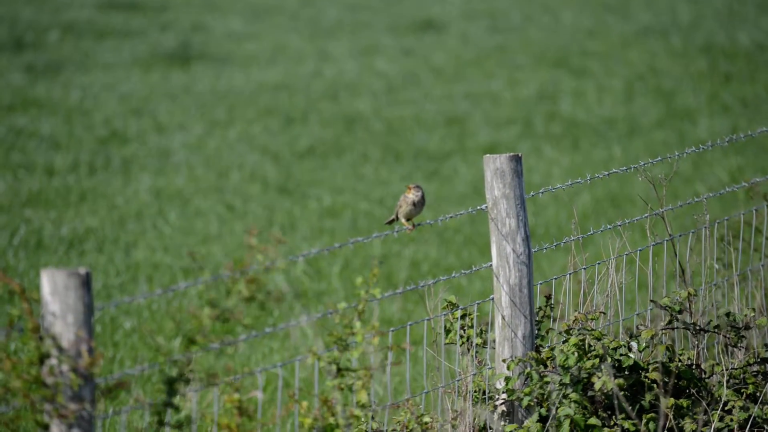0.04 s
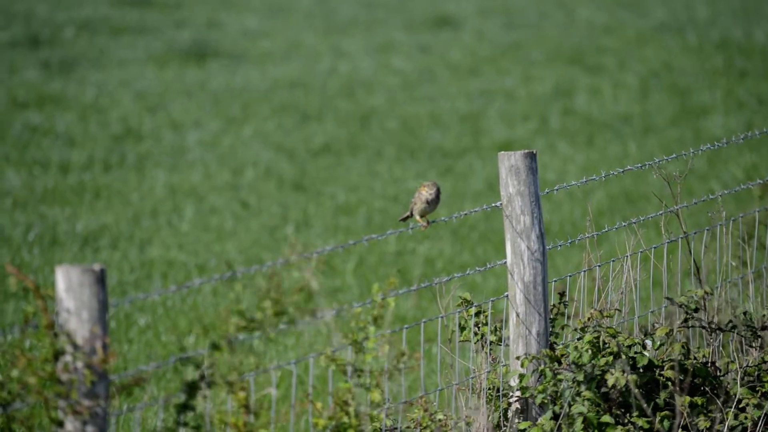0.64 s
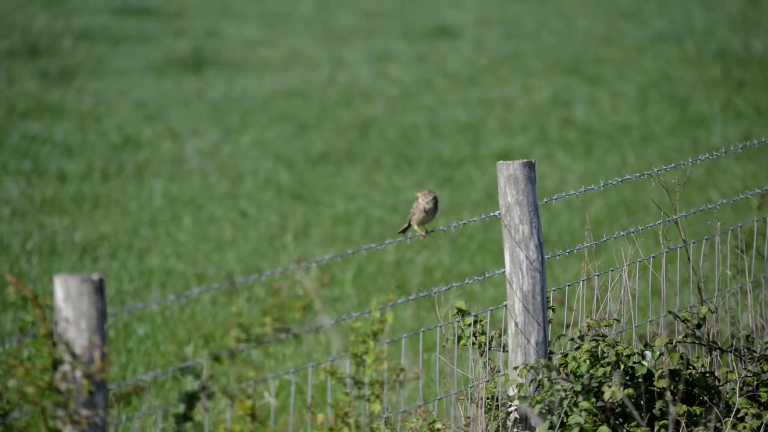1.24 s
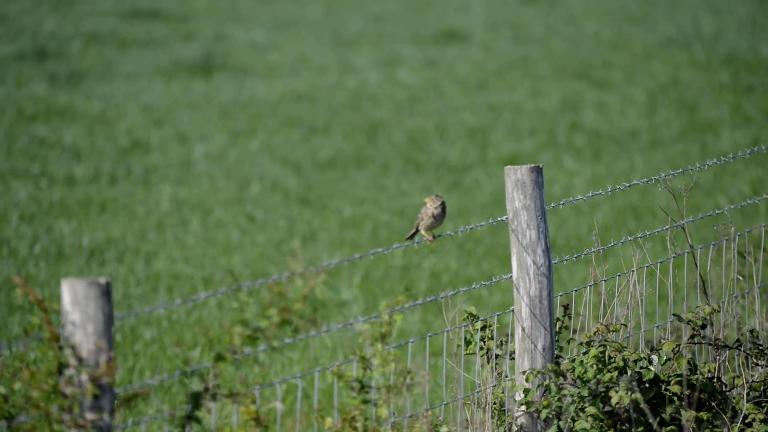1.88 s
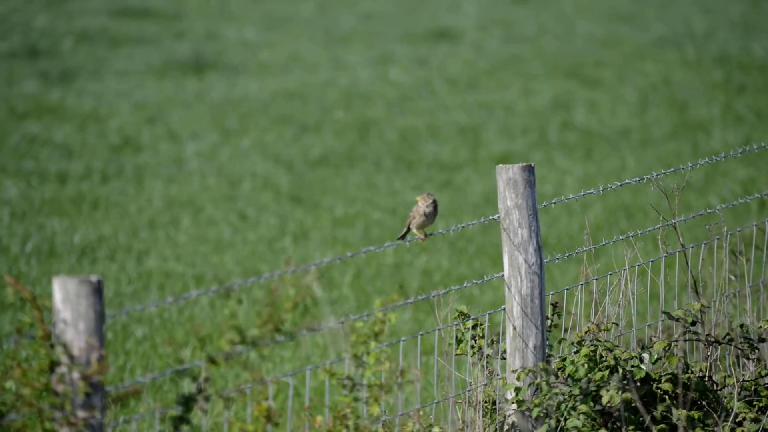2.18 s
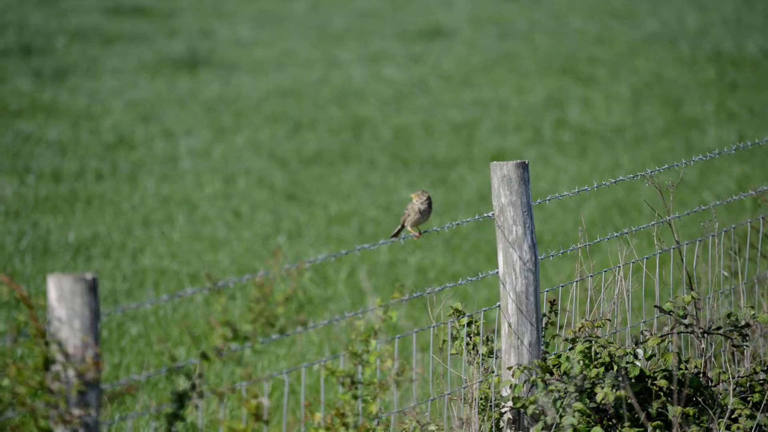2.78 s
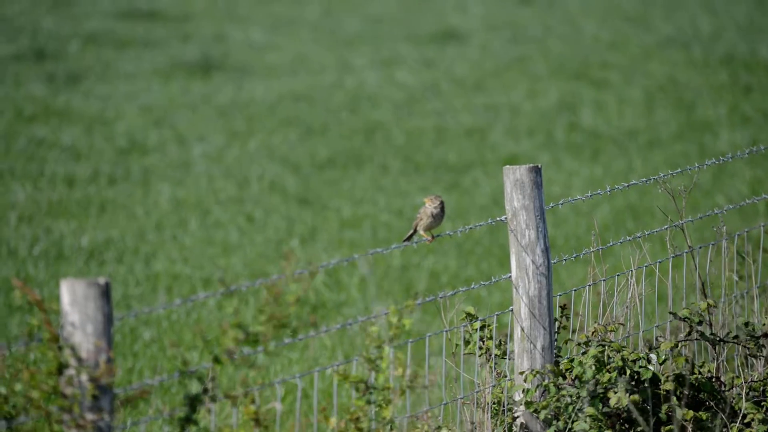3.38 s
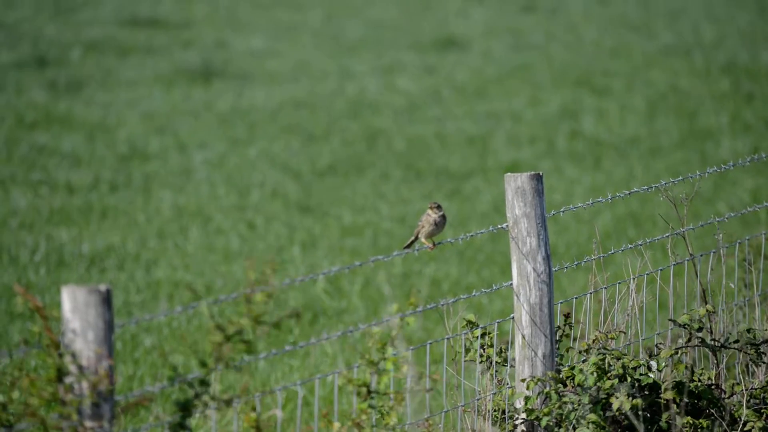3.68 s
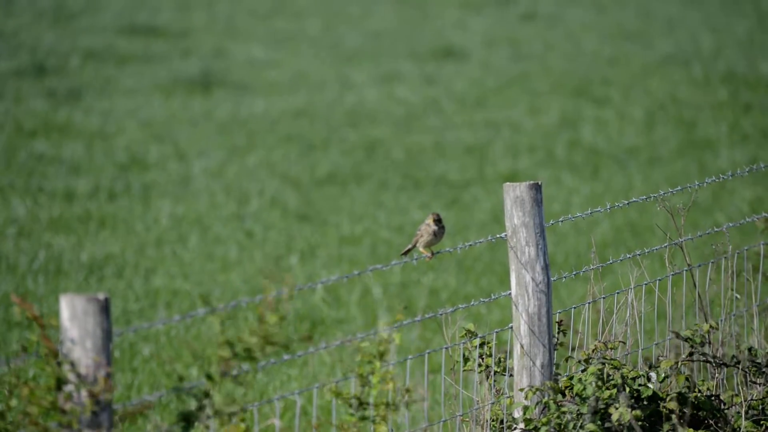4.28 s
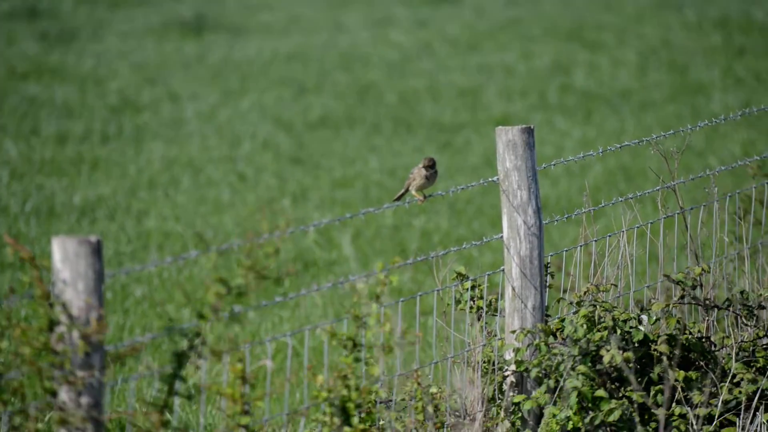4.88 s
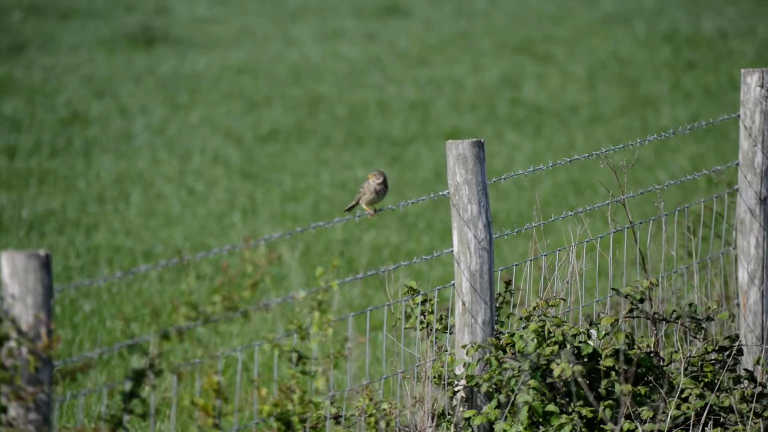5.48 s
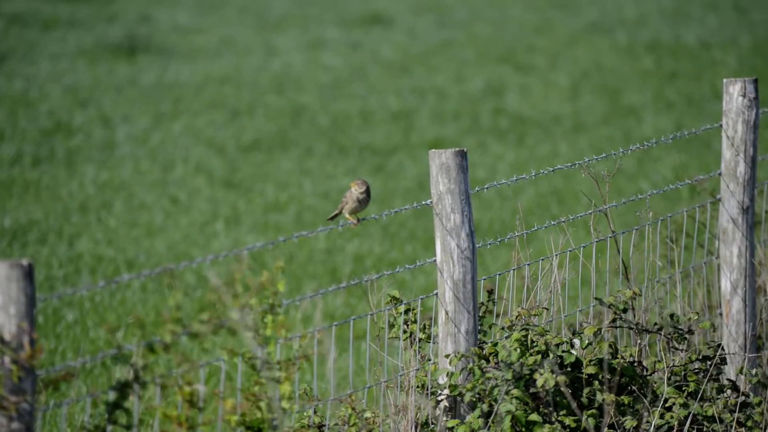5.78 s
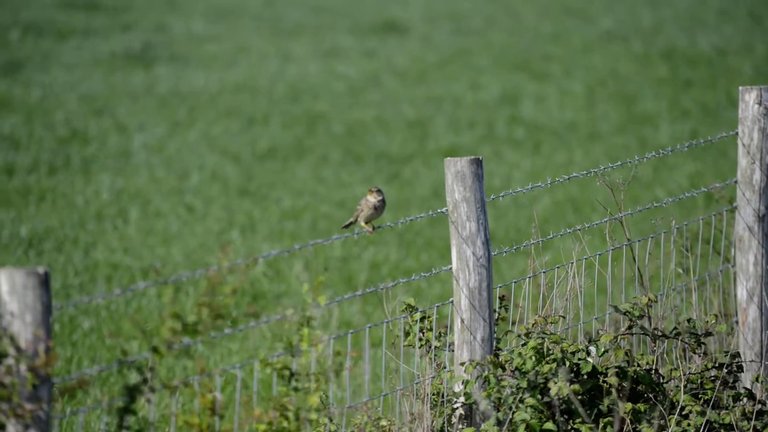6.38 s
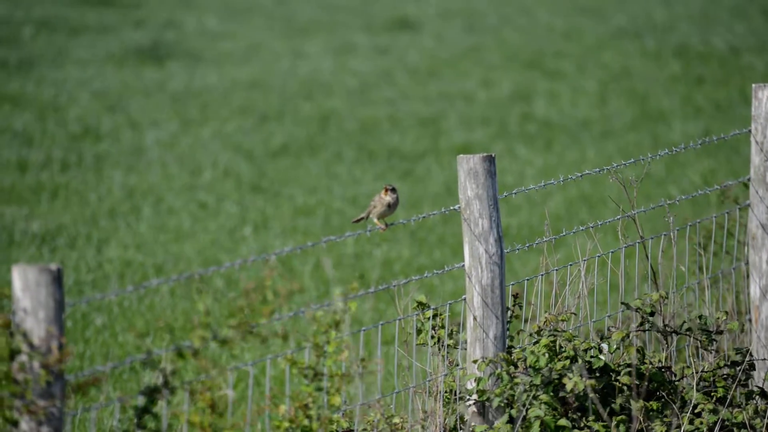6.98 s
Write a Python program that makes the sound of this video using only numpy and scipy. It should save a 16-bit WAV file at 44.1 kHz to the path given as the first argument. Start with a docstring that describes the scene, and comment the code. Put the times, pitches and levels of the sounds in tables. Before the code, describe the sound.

Dry ticks speed into a buzzy jangle from a small bird, with far lark trills and gusty wind rumble behind.

```python
"""A bunting sings on a fence wire in an open field: dry ticks speed up into a jangle of buzzes and
two-voiced chips from the two sides of its syrinx. Further off a lark whistles and trills; grass and
hedges scatter the songs. Faint, breathy swells of noise come and go, and a soft drone enters late.
Gusts buffet the microphone over a low rumble, and the hardest make the camera's limiter duck."""
import sys
import numpy as np
from scipy import signal
from scipy.fft import rfft, irfft, next_fast_len
from scipy.io import wavfile
from scipy.ndimage import uniform_filter1d, minimum_filter1d, map_coordinates

SR = 44100
rng = np.random.default_rng(int(sys.argv[2]) if len(sys.argv) > 2 else 0)


def persist_wave(psi):
    """Save psi, clipped to +-1, as 16-bit WAV."""
    counts = np.round(np.clip(psi, -1, 1) * 32767).astype(np.int16)
    wavfile.write(sys.argv[1], SR, np.atleast_2d(counts).T)


N = 319284


def amp(db):
    """Decibels to gain."""
    return 10 ** (np.asarray(db) / 20)


def unit(x):
    """x at rms 1."""
    return x / np.sqrt(np.mean(x ** 2) + 1e-20)


def clock(length):
    """Sample times of a sound of this length."""
    return np.arange(max(int(length * SR), 8)) / SR


def add(track, s, sound):
    """Mix a sound into the track at time s."""
    start = int(np.clip(round(s * SR), 0, N))
    track[start:start + len(sound)] += sound[:N - start]


def wobble(rate):
    """Smooth random modulation for a whole track, rate knots a second."""
    return map_coordinates(rng.standard_normal(int(N * rate / SR) + 4), [np.arange(N) * rate / SR])


def drift(t, rate):
    """Smooth random modulation over one note's sample times t."""
    return map_coordinates(rng.standard_normal(size=64), [t * rate], mode="mirror")


def filtered(x, response):
    """EQ x with a gain curve over frequency."""
    size = next_fast_len(N + SR // 2)
    return irfft(rfft(x, size) * response(np.fft.rfftfreq(size, 1 / SR)), size)[:N]


def noise(spectrum):
    """Noise of rms 1 coloured by (frequency [Hz], level [dB]) points."""
    hz, db = np.transpose(spectrum)
    colour = lambda f: amp(np.interp(np.log(f + 1), np.log(hz), db, right=-120))
    return unit(filtered(rng.standard_normal(N), colour))


def tone(hz):
    """A pure syrinx tone that follows a pitch curve."""
    return np.sin(2 * np.pi * (np.cumsum(hz) / SR + rng.random()))


def arch(u, power):
    """Fade in and out as u runs from 0 to 1; a low power gives hard edges."""
    hump = np.abs(np.sin(np.pi * u))
    return hump ** power * np.tanh(2 * np.pi * hump) ** 2


def glide(length, pitches, edge, waver_hz):
    """One bird note, curving through its start, middle and end pitch with a slight waver."""
    t = clock(length)
    hz = np.polyval(np.polyfit([0, .5, 1], pitches, 2), t / length)
    return arch(t / length, edge) * tone(hz + waver_hz * drift(t, 180.4))


# tone colour of the open field: (frequency [Hz], relative level [dB])
FIELD_EQ = [(25, 10), (170, -6), (400, -3), (520, -10.5), (1400, -11), (2300, -15.5), (4500, -18.5),
            (6500, -25.5), (8500, -29), (16000, -30.5)]
def field_bed(db):
    """A steady, soft hiss under everything."""
    return amp(db) * noise(FIELD_EQ)


# fader ride of the slow air: (time [s], relative level [dB])
BREEZE_RIDE = [(0.0, -30), (0.38, -34.5), (0.58, -26), (0.72, -58), (0.91, -60.5), (1.19, -40.5),
               (1.41, -27), (2.2, -37), (3.27, -33), (3.41, -39), (3.77, -46.5), (4.36, -41), (4.6, -25),
               (4.7, -26), (4.88, -49.5), (7.24, -51)]
# its tone colour: (frequency [Hz], relative level [dB])
RUMBLE_EQ = [(25, -17), (70, 1), (140, -4), (260, -14), (600, -44.5)]
def breeze(db, unrest_db):
    """The slower air between the gusts only rumbles."""
    ride_db = np.interp(np.arange(N) / SR, *np.transpose(BREEZE_RIDE))
    return amp(db + ride_db + unrest_db * wobble(12)) * noise(RUMBLE_EQ)


# buzz cues: (time [s], length [s], pitch [Hz], pitch swing [Hz], flutter rate [Hz], level [dB])
BUZZ_CUES = [(.021, .06, 4725, 330, 415, -17), (.134, .062, 4635, 420, 385, -16),
             (.341, .025, 5550, 400, 620, -17), (7.02, .062, 4667, 330, 392, -20),
             (7.22, .04, 4650, 420, 385, -13)]
def bunting_buzzes(depth, swell_db, lag_rad, overtone_db, bend_hz, waver_hz):
    """A fast flutter of the syrinx swings pitch and loudness together; each buzz bends up and swells."""
    song = np.zeros(N)
    for s, length, hz, swing_hz, rate, db in BUZZ_CUES:
        t = clock(length)
        u = t / length
        flutter = 2 * np.pi * rate * t + .25 * drift(t, 90)
        centre = hz - bend_hz * (1 - u) ** 5 + waver_hz * drift(t, 250)
        pitch = centre + swing_hz * np.cos(flutter)
        swell = amp(db + swell_db * (u - 1)) * arch(u, .3)
        tremolo = (1 + depth * np.cos(flutter - lag_rad)) / (1 + depth)
        voice = tone(pitch) + amp(overtone_db) * tone(pitch + centre - rate)
        add(song, s, swell * tremolo * voice)
    return song


def chorus(count, db, low_hz, high_hz, sweep_hz, fall_hz):
    """A sprinkle of soft chirps from the lark and more distant birds; most of them fall."""
    song = np.zeros(N)
    for when, long, high, slope, bend, soft in rng.random((count, 6)):
        hz = low_hz + (high_hz - low_hz) * high
        fall = fall_hz + sweep_hz * (slope - .5)
        pitches = [hz + fall / 2, hz + sweep_hz * (bend - .5) / 4, hz - fall / 2]
        chirp = glide(0.0083 + 0.0304 * long, pitches, edge=0.36, waver_hz=99.5)
        add(song, when * N / SR, amp(db - 10 * soft) * chirp)
    return song


# trill cues: (time [s], length [s], start pitch [Hz], end pitch [Hz], nominal pulse sweep [Hz],
# pulse rate [Hz], relative level [dB])
TRILL_CUES = [(0.057, .11, 3850, 2920, 340, 102, -36), (.48, .115, 4900, 5150, 1021, 100, -33),
              (0.774, 0.042, 4850, 4480, 1020, 130, -32), (2.109, 0.071, 4300, 5140, 1190, 112, -34),
              (2.183, 0.13, 4950, 5000, 1190, 110, -36), (2.355, 0.082, 4450, 3620, 1186, 71, -33),
              (2.59, .13, 4300, 4400, 702, 97, -37), (2.938, 0.37, 3040, 3360, 200, 55, -44.5),
              (3.345, 0.031, 4700, 4740, 1020, 140, -35.5), (3.4, 0.12, 4740, 3150, 500, 68, -42.5),
              (3.854, .04, 3500, 2980, 680, 88, -45), (4.192, 0.12, 4450, 5130, 680, 83, -36.5),
              (4.361, 0.076, 4500, 5010, 680, 88, -37), (4.495, 0.17, 3150, 3330, -340, 51, -43.5),
              (4.521, .14, 4600, 4890, 2600, 53, -37.5), (4.71, 0.06, 4600, 4610, 850, 85, -30.5),
              (4.778, 0.079, 4680, 4680, 760, 82, -30.5), (5.25, 0.13, 5150, 4710, -850, 47, -37.5),
              (5.567, 0.06, 4150, 4080, 700, 110, -29), (5.732, 0.12, 5050, 4950, 1400, 58, -35),
              (5.961, 0.21, 4350, 2950, -420, 52, -39.5), (6.015, 0.048, 5100, 5200, 420, 71, -36),
              (6.247, .105, 3600, 3480, 680, 49, -37.5), (6.256, .23, 2850, 2530, -260, 57, -44),
              (6.45, 0.2, 5000, 5170, 1500, 56, -37)]
def lark_trills(hook_hz, waver_hz, uneven_db, vary, stumble):
    """Runs of steep, hooked sweeps; pace, pitch, reach and loudness vary from pulse to pulse."""
    song = np.zeros(N)
    for s, length, start_hz, end_hz, sweep_hz, rate, db in TRILL_CUES:
        t = clock(length)
        cycle = (t * rate + stumble * drift(t, rate / 2)) % 1
        sweep = sweep_hz * (1 + vary * drift(t, rate)) * np.tanh(5 * (cycle - .5)) / 2.33
        hook = hook_hz * (2 * cycle - 1) ** 2  # each pulse sags at both ends
        pitch = np.linspace(start_hz, end_hz, len(t)) + sweep - hook + waver_hz * drift(t, rate)
        pulses = amp(db + uneven_db * drift(t, rate)) * arch(cycle, 1.8)
        add(song, s, pulses * arch(t / length, .03) * tone(pitch))
    return song


# each syllable's strokes, from the two sides of the syrinx:
# (delay [s], length [s], start pitch [Hz], end pitch [Hz], trim [dB])
SYLLABLE_STROKES = { "chink": [(0, 0.0076, 7770, 7100, -11), (.0005, 0.00766, 6530, 4960, -1.5)],
                    "clink": [(0, .0035, 6900, 6400, -10), (.006, 0.0067, 6750, 4780, -1)],
                    "rattle": [(0, 0.0038, 7750, 7250, -7.5), (.0005, 0.0047, 5800, 4920, -1.5)],
                    "stutter": [(0.0012, 0.0073, 6900, 5450, 0)], "jingle": [(0, 0.013, 7400, 6970, -8),
                    (.0095, 0.0074, 7000, 5240, -1)], "skirl": [(0, 0.023, 7750, 5640, -12),
                    (.0155, .0038, 7430, 4650, -7.5), (.019, .0075, 5820, 4950, -1.5)],
                    "tsip": [(0.00046, 0.012, 7750, 7250, -2.5)],
                    "tsee": [(0.0011, 0.016, 7450, 6440, -2.5)]}
# even runs: (time [s], syllable, count, period [s], first relative level [dB], last relative level [dB])
CHIP_RUNS = [(0.084, "chink", 2, .012, -27.5, -29), (.2124, "rattle", 6, .0062, -27.5, -27.5),
             (.258, "chink", 2, .021, -21.5, -24.5), (0.385, "stutter", 7, .0059, -29, -25),
             (0.4479, "jingle", 5, 0.018, -23, -26), (0.603, "stutter", 2, 0.0088, -35, -31),
             (0.6227, "skirl", 5, 0.03, -26.5, -23), (6.7987, "clink", 4, .0196, -25.5, -20),
             (6.8755, "clink", 3, .0198, -19.5, -22), (6.9564, "chink", 3, .0211, -21, -23),
             (7.094, "chink", 2, .02, -23, -21.5), (7.134, "rattle", 6, 0.0045, -30, -29.5),
             (7.1598, "chink", 2, .021, -24, -25)]
# one-shots: (time [s], syllable, relative level [dB])
SINGLE_CHIPS = [(.3214, "tsip", -30), (.434, "tsip", -34), (.805, "tsee", -32), (.851, "tsee", -30.5),
                (.9146, "tsee", -34.5), (6.945, "tsee", -28), (7.1696, "tsip", -30), (7.1817, "tsip", -29)]
def bunting_chips(edge, waver_hz, flicker_db, pitch_spread, spread_db):
    """Each syrinx stroke sweeps down fast, then settles; no two are alike. Runs swell, hold or fade."""
    song, cues = np.zeros(N), list(SINGLE_CHIPS)
    for s, name, count, period, first_db, last_db in CHIP_RUNS:
        ramp_db = np.linspace(first_db, last_db, round(count))
        cues += [(s + k * period, name, db) for k, db in enumerate(ramp_db)]
    for s, name, db in cues:
        for delay, length, start_hz, end_hz, trim_db in SYLLABLE_STROKES[name]:
            t = clock(length)
            sharp, loud = rng.standard_normal(2)
            sweep = end_hz + (start_hz - end_hz) * (1 - t / length) ** 2
            pitch = sweep * (1 + pitch_spread * sharp) + waver_hz * drift(t, 810)
            envelope = amp(db + trim_db + spread_db * loud) * arch(t / length, edge)
            add(song, s + delay, envelope * tone(pitch))
    return song * amp(flicker_db * wobble(500))


# gust cues: (time [s], hold [s], strength [dB])
GUST_CUES = [(0.112, 0.067, -14.5), (0.374, 0.058, -7.5), (0.509, 0.051, -12), (0.607, 0.0082, -13.5),
             (0.667, 0.066, -13.5), (1.298, 0.03, -13), (1.385, 0.06, -14.5), (1.483, 0.14, -10),
             (1.742, 0.056, -16), (1.997, 0.023, -19), (2.092, .18, -20.5), (2.466, 0.079, -11.5),
             (2.595, 0.19, -17.5), (2.947, 0.031, -12.5), (3.033, 0.0082, -16), (3.1, 0.21, -19),
             (3.343, 0.055, -20.5), (3.685, 0.049, -24.5), (3.976, 0.012, -9.5), (4.057, 0.026, -20.5),
             (4.168, 0.0047, -21.5), (4.289, 0.0092, -25), (4.4, 0.028, -18.5), (4.571, 0.078, -23),
             (4.676, 0.036, -13), (4.752, 0.11, -28.5), (5.204, 0.11, -36.5), (5.806, 0.075, -27)]
def gust_envelope(attack_s, release_s):
    """Wind strength in dB: each gust builds quickly, holds and dies away."""
    t = np.arange(N) / SR
    force = np.zeros(N)
    for s, hold, db in GUST_CUES:
        before, after = np.maximum(s - t, 0), np.maximum(t - s - hold, 0)
        force += amp(db) * np.exp(-before / attack_s - after / release_s)
    return 20 * np.log10(force + amp(-67))


# eddies, large to small: (band centre [Hz], level in a -20.5 dB gust [dB], growth [dB per dB of gust])
EDDY_BANDS = [(76, -29, 0.57), (153.5, -29, 1.07), (303.6, -35, 1.24), (600, -48, 1.72), (975, -61, 1.81)]
def wind_buffets(gust_db, band_width, lump_depth):
    """Turbulence on the microphone: the harder the gust, the more small, fast eddies."""
    lumps = np.tanh(wobble(70)) + np.tanh(wobble(190)) / 2
    air = np.zeros(N)
    for hz, db, growth in EDDY_BANDS:
        octaves = band_width / growth
        band = filtered(rng.standard_normal(N), lambda f: np.exp(-(np.log2((f + 1) / hz) / octaves) ** 2))
        lumpy_band = unit(band * amp(lump_depth * growth ** 2 * lumps))
        air += amp(db + growth * (gust_db + 20.5)) * lumpy_band
    return air


# one tick in mid-song, then those that open the next song: (time [s], level [dB])
TICK_CUES = [(0.1977, -25), (6.157, -26.5), (6.349, -20), (6.498, -16), (6.6192, -19), (6.6616, -17.5),
             (6.703, -15), (6.744, -15)]
# contour of a tick: (time into the tick [s], pitch [Hz], trim [dB])
TICK_CONTOUR = [(0, 4160, -6), (.001, 5190, 4), (.0022, 5860, 0), (.0036, 4260, -0.5), (.0048, 6150, -8),
                (.0065, 5000, -1), (.008, 4640, 0.5), (0.0103, 4900, -23)]
def bunting_ticks():
    """Each tick is two very fast pitch arches joined together."""
    song = np.zeros(N)
    knots, hz, trim_db = np.transpose(TICK_CONTOUR)
    t = clock(knots[-1])
    envelope = amp(np.interp(t, knots, trim_db)) * arch(t / t[-1], 0.14)
    for s, db in TICK_CUES:
        add(song, s, amp(db) * envelope * tone(np.interp(t, knots, hz)))
    return song


# the lark's five kinds of note, each: (time [s], length [s], middle pitch [Hz], level [dB])
SAGGING_WHISTLES = [(.272, 0.091, 4285, -34), (.6, .12, 2650, -49), (.835, .097, 2915, -41),
                    (1.035, 0.19, 4560, -36.5), (2.087, .13, 2594, -45), (2.64, 0.11, 4490, -36.5),
                    (2.92, 0.16, 3760, -45), (3.63, .14, 2660, -42), (3.778, .11, 4810, -38),
                    (4.045, 0.15, 4640, -40), (4.924, 0.027, 3940, -27), (4.978, .1, 3836, -29),
                    (5.265, 0.13, 4720, -35.5), (5.603, 0.03, 4900, -29), (5.637, 0.031, 4290, -28),
                    (5.728, 0.12, 2670, -42), (5.85, 0.022, 3800, -33.5), (6.849, 0.053, 3910, -31.5),
                    (6.9, 0.13, 3750, -30.5)]
RISING_WHISTLES = [(1.546, 0.21, 4220, -49.5), (3.051, .18, 4230, -45.5), (4.605, 0.16, 4010, -43),
                   (5.135, 0.17, 4220, -39.5)]
HELD_NOTES = [(1.217, 0.041, 4100, -42), (1.335, .029, 5290, -40), (1.362, 0.032, 4720, -37),
              (2.188, 0.074, 3720, -34.5), (2.845, 0.028, 4060, -42), (3.198, 0.024, 5560, -47),
              (3.446, 0.074, 4420, -36), (3.84, 0.024, 2500, -38.5), (3.925, 0.036, 2500, -42),
              (4.745, 0.029, 4920, -30), (4.844, 0.029, 4860, -30), (5.43, 0.116, 3500, -34.5),
              (5.74, 0.027, 4200, -27.5), (6.672, 0.028, 4800, -30), (6.767, 0.028, 4820, -28)]
DOWN_SLURS = [(.803, 0.038, 3600, -37.5), (1.09, 0.028, 3900, -41), (1.255, 0.033, 3620, -44),
              (1.455, 0.058, 4480, -39), (2.039, 0.03, 3950, -35.5), (2.322, 0.014, 4200, -28),
              (3.159, 0.01, 4870, -39), (3.225, 0.027, 4680, -38), (3.571, 0.014, 3950, -40),
              (3.602, .012, 4100, -36), (3.62, .011, 4500, -38.5), (3.645, .009, 4650, -36),
              (3.707, 0.022, 3610, -39.5), (3.94, 0.042, 4070, -36), (4.015, .023, 4100, -34.5),
              (4.297, 0.021, 4740, -29), (4.413, 0.013, 3270, -36.5), (4.437, 0.0165, 4350, -34),
              (4.461, 0.016, 4770, -32.5), (5.03, .028, 5540, -46), (5.133, 0.038, 5200, -39.5),
              (5.624, .036, 3730, -33), (5.967, .022, 6140, -44.5), (6.075, 0.026, 5900, -42.5),
              (6.103, 0.02, 4270, -33.5), (6.192, 0.046, 4520, -31)]
UP_SLURS = [(1.393, 0.017, 4410, -38.5), (3.9, 0.014, 4850, -33), (3.917, 0.019, 4520, -35),
            (5.162, .016, 4600, -33), (5.204, 0.038, 4810, -35.5), (5.245, 0.0274, 4720, -33.5),
            (5.712, .013, 4680, -26.5), (5.917, 0.0275, 4410, -32.5), (6.369, 0.11, 4580, -41),
            (7.192, 0.03, 4600, -34)]
# a ladder of three upward slurs:
# (delay [s], length [s], start pitch [Hz], middle pitch [Hz], end pitch [Hz], trim [dB])
LADDER_STEPS = [(0, .019, 3570, 4140, 4350, 0), (0.028, .021, 3760, 4820, 5150, 3.5),
                (0.047, .027, 4720, 5400, 6250, -1)]
# ladder cues: (time [s], level [dB])
LADDER_CUES = [(1.609, -42.5), (1.733, -41.5), (1.862, -35), (1.992, -33)]
def lark_notes(edge, waver_hz):
    """Whistled notes of one kind share their bend; the ladder comes four times, growing louder."""
    song = np.zeros(N)
    # (notes, start pitch [x middle], end pitch [x middle])
    bends = [(SAGGING_WHISTLES, 1.04, 0.94), (RISING_WHISTLES, .84, 1.08), (HELD_NOTES, 0.94, 0.97),
             (DOWN_SLURS, 1.13, 0.868), (UP_SLURS, .91, 1.035)]
    for notes, start, end in bends:
        for s, length, hz, db in notes:
            add(song, s, amp(db) * glide(length, [hz * start, hz, hz * end], edge, waver_hz))
    for s, db in LADDER_CUES:
        for delay, length, *pitches, trim_db in LADDER_STEPS:
            add(song, s + delay, amp(db + trim_db) * glide(length, pitches, edge, waver_hz))
    return song


# eddies that hit the microphone: (time [s], relative peak level [dB])
THUMP_CUES = [(0.373, -2), (0.392, 6), (.521, 1), (.697, 0), (1.43, 7), (1.507, 3.5), (1.539, -5),
              (1.565, -5), (2.477, -7), (2.516, -0.5), (2.731, 3), (2.905, -9), (2.962, -2.5), (3.098, -10),
              (3.234, -8), (3.97, -1.5), (3.978, -11), (4.697, -2)]
def wind_thumps(width_s, rebound_stretch, db):
    """An eddy core passes: the pressure drops sharply, then overshoots."""
    track, t = np.zeros(N), clock(.03) - .015
    cusp = lambda late, span: np.exp(-np.hypot(t - late, .0003) / span) / span
    dip = cusp(.002, width_s) - cusp(.003, width_s * rebound_stretch)
    for s, peak_db in THUMP_CUES:
        add(track, s + t[0], -amp(peak_db + db) * dip / np.abs(dip).max())
    return track


def lark_warble(s, length, hz, swing_hz, rate_hz, fall_hz, db):
    """One falling note with a deep, uneven vibrato."""
    song, t = np.zeros(N), clock(length)
    vibrato = np.sin(2 * np.pi * rate_hz * t + drift(t, 70))
    pitch = hz - fall_hz * t / length + swing_hz * vibrato
    add(song, s, amp(db) * arch(t / length, 0.26) * tone(pitch))
    return song


# swell cues: (time [s], length [s], level [dB])
SWELL_CUES = [(1.63, 0.6, -47), (2.743, 0.46, -54.5), (4.07, .68, -48.5), (5.098, .48, -51.5),
              (6.451, 0.52, -49)]
# tone colour of the swells: (frequency [Hz], relative level [dB])
SWELL_EQ = [(900, -15), (1180, -9), (1320, -1), (1550, -11), (1900, -15.5), (2400, -17)]
def breathy_swells(flicker_db):
    """Faint, breathy swells of noise near 1.3 kHz, with a slight flicker in level."""
    swell = np.zeros(N)
    for s, length, db in SWELL_CUES:
        add(swell, s, amp(db) * arch(clock(length) / length, 0.84))
    return swell * unit(noise(SWELL_EQ) * amp(flicker_db * wobble(120)))


def far_drone(hz, width_hz, db):
    """A faint, fuzzy drone far away that fades in towards the end."""
    band = unit(filtered(rng.standard_normal(N), lambda f: 1 / (1 + ((f - hz) / width_hz) ** 2)))
    fade_in = np.interp(np.arange(N) / SR, [5, 6.3], [0, 1])
    return amp(db) * band * fade_in


def throat(x):
    """A bird's throat passes only its singing band."""
    return filtered(x, lambda f: 1 / (1 + (f / 9000) ** 24) / (1 + (2300 / (f + 1)) ** 10))


def scatter(x, t60, build_s):
    """Diffuse reverb from grass and hedges."""
    t = clock(t60)
    tail = rng.standard_normal(len(t)) * amp(-60 * t / t60) * (1 - np.exp(-t / build_s))
    return signal.fftconvolve(x, tail / np.linalg.norm(tail))[:N]


def scene():
    """The near bunting sounds almost dry, the far lark wetter; wind and field lie under both."""
    chips = bunting_chips(edge=0.39, waver_hz=148, flicker_db=1.5, pitch_spread=0.011, spread_db=0.8)
    ticks = bunting_ticks()
    buzzes = bunting_buzzes(depth=0.26, swell_db=8.5, lag_rad=0.73, overtone_db=-23,
                            bend_hz=129, waver_hz=24.2)
    bunting = throat(amp(4.7) * chips + ticks + buzzes)
    notes = lark_notes(edge=0.033, waver_hz=21.5)
    trills = lark_trills(hook_hz=346.4, waver_hz=59.6, uneven_db=2, vary=0.22, stumble=.08)
    warble = lark_warble(s=0.928, length=0.114, hz=4530, swing_hz=315, rate_hz=140, fall_hz=202, db=-31)
    chirps = chorus(count=220, db=-40.5, low_hz=2602, high_hz=5040, sweep_hz=1610, fall_hz=346)
    far_birds = throat(notes + amp(2.03) * trills + warble + chirps)
    reverb = (amp(-8.5) * scatter(bunting, t60=0.081, build_s=0.00029)
              + amp(-21.5) * scatter(bunting, t60=0.77, build_s=0.018)
              + amp(-9) * scatter(far_birds, t60=0.28, build_s=0.0052))
    gust_db = gust_envelope(attack_s=0.011, release_s=.014)
    wind = (wind_buffets(gust_db, band_width=0.81, lump_depth=5)
            + wind_thumps(width_s=0.00052, rebound_stretch=2.18, db=-3.5)
            + breeze(db=1.5, unrest_db=2))
    swells = breathy_swells(flicker_db=1)
    backdrop = far_drone(hz=398, width_hz=21, db=-55.5) + field_bed(db=-46.5)
    return (bunting + far_birds + reverb + wind + swells + backdrop)[None]


def record(dry):
    """The camera's limiter ducks at the hardest buffets and recovers slowly; sub-bass and top are cut."""
    threshold_db, release_db_per_s = -1, 24.5
    low_cut_hz, high_cut_hz = 30, 15800
    over_db = np.maximum(20 * np.log10(np.abs(dry[0]) + 1e-9) - threshold_db, 0)
    recovery_db = release_db_per_s * np.arange(N) / SR
    duck_db = np.maximum.accumulate(over_db + recovery_db) - recovery_db
    gain = uniform_filter1d(minimum_filter1d(amp(-duck_db), size=65), size=65)  # smooth look-ahead
    passband = lambda hz: (hz < high_cut_hz) * hz ** 2 / (hz ** 2 + low_cut_hz ** 2)
    return filtered(dry[0] * gain, passband)[None]


dry = scene()
out = record(dry)
persist_wave(out)
```